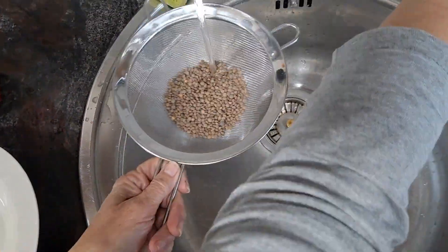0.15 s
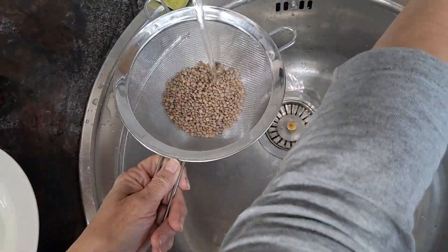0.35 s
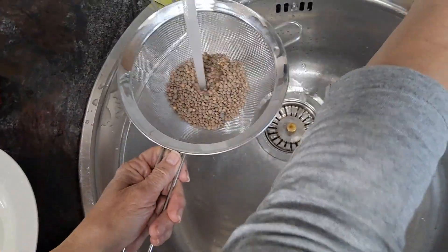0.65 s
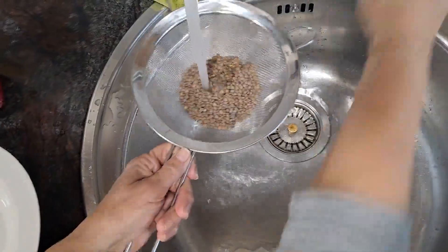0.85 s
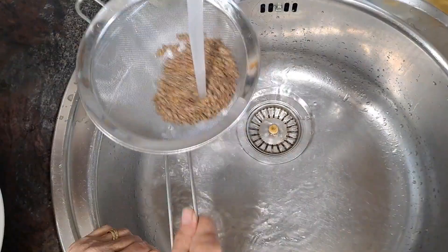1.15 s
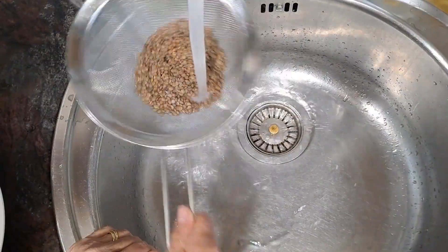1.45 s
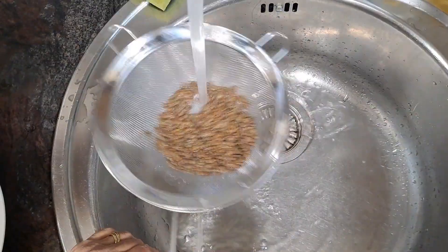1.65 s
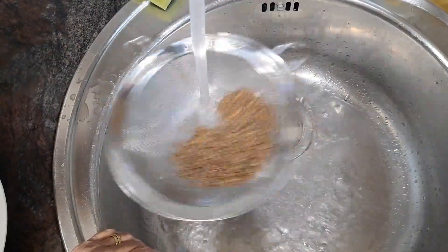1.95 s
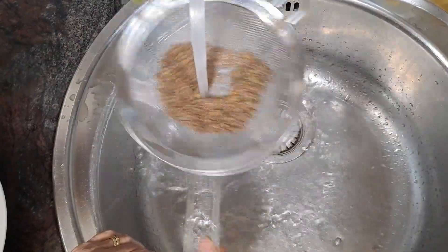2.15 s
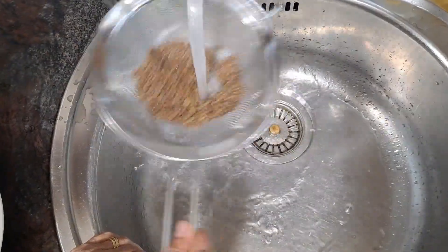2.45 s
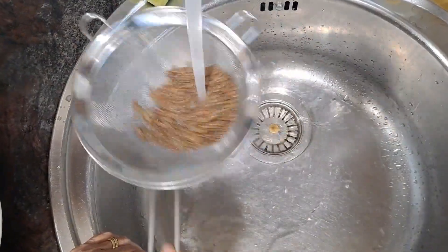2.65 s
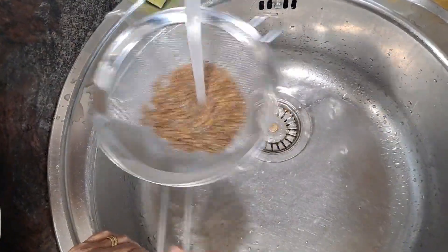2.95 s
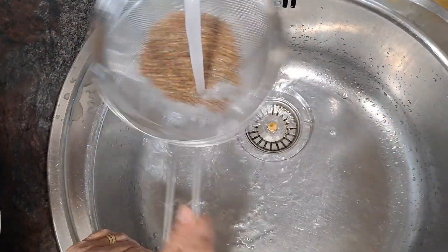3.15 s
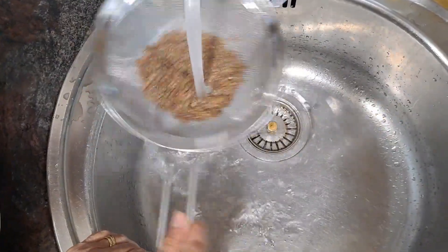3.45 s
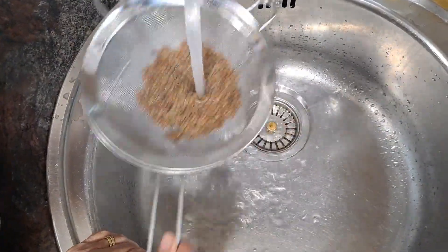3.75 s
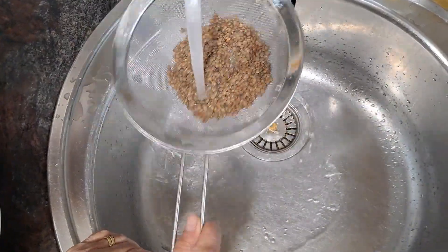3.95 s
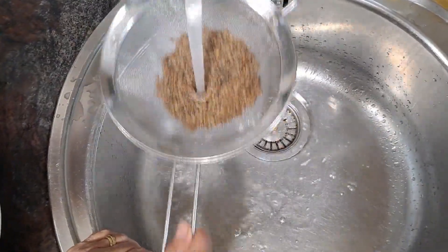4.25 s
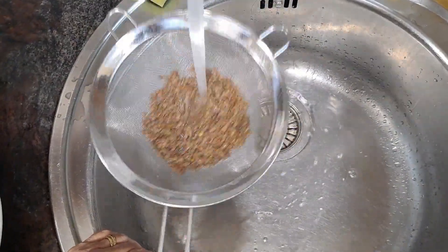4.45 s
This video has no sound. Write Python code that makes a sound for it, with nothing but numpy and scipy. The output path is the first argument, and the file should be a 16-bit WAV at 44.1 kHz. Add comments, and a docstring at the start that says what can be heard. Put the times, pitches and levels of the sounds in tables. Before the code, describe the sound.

In a quiet kitchen, separate drops and thin spatter tick for half a second as a tap opens onto lentils in a mesh strainer. By about one second the stream is a full bright hiss. It then surges with each swirl, with sharp splashes, small bubbly plips and low drumming of run-off on the steel sink. Close stereo pickup, little room sound.

```python
"""Rinsing lentils under the tap

Tap water is opened onto lentils in a mesh strainer that is then swirled over a steel sink.
Spray is banded noise whose power leaps with each drop; bubbles are short tones of rising pitch.
What runs through drums on the sink's bottom: shaken resonances that follow a list of gushes.
Two unlike microphone ports hear it close by, over a low room murmur; the sound drops out once."""
import sys
import numpy as np
from scipy import signal
from scipy.fft import rfft, irfft
from scipy.io import wavfile
from scipy.ndimage import uniform_filter1d

SR = 44100
rng = np.random.default_rng(int(sys.argv[2]) if len(sys.argv) > 2 else 0)


def unload_wav(signal):
    """Save mono or channel-first audio to the path in sys.argv[1] as 16-bit WAV at rate SR, clipped to [-1, 1]."""
    wavfile.write(
        sys.argv[1],
        SR,
        np.round(np.clip(np.atleast_2d(signal).T, -1, 1) * 32767).astype(np.int16),
    )


def attenuation_scalar(level_db):
    """Turn a level in dB into a linear amplitude multiplier (20 dB per decade)."""
    decades = np.asarray(level_db, float) / 20
    return 10 ** decades


N = 202680

# Centres of the spray's four bands, in Hz: gurgle, splatter, fizz, mist.
BAND_CENTRES_HZ = [1500, 3100, 6500, 13000]
# Spray bands in the same order. Each row: level in dB at full flow, dB per dB of fizz.
BAND_LEVELS = [(-42.5, 0.8), (-35.5, 0.9), (-31.0, 1.0), (-36.5, 0.85)]
# Water from the tap. Each row: time in seconds, fizz level in dB before the swings,
# dB by which gurgle strays from it, dB by which splatter strays.
FLOW_COURSE = [(0, -40.5, -13, -11), (.04, -49.5, -19, -5), (.22, -51, -2, -4), (.3, -54, -16, -4),
               (.38, -49, -12, -3), (.4, -45, -8, -5), (.47, -48.5, -8, -6), (.56, -39, -3.5, -2),
               (.7, -37.5, 1, -4), (.8, -41, 1, 2.5), (.9, -31.5, -1.5, -1.5), (1.12, -32, -3.5, -2.5),
               (1.3, -37, -0.5, 0.5), (1.6, -35, -1, -0.5), (1.98, -37.5, 1.5, 3), (2.03, -31, -2, -1.5),
               (2.27, -33, 1, 2.5), (2.75, -29, 1.5, 0), (2.88, -32.5, -1, 0.5), (2.93, -38, 3.5, 2.5),
               (3.22, -35, -0.5, -2.5), (3.51, -31, 1.5, 0), (3.97, -33.5, -1.5, 0.5),
               (4.22, -36, -0.5, -0.5), (4.6, -33.5, 0, 1)]
# Swings that throw the lentils under the stream. Each row: time of the top in seconds, dB gained.
STRAINER_SWINGS = [(1.228, 8.5), (1.43, 5.5), (1.64, 4.5), (1.82, 5.5), (2.08, 5), (2.32, 4), (2.44, 1),
                   (2.972, 7.5), (3.27, 7.5), (3.72, 1), (4.07, 4.5), (4.28, 3), (4.55, 2)]
# Single splashes. Each row: start in seconds, bubble's peak in dB before the bowl, pitch in Hz.
SPLASH_LIST = [(0.0596, -24.0, 5200), (0.093, -23.5, 4700), (0.1085, -24, 7460), (0.1267, -27, 4080),
               (0.131, -22.5, 6540), (0.1535, -27.5, 4370), (0.1943, -24.5, 6100), (0.206, -27.5, 12400),
               (0.237, -33.5, 4950), (0.268, -28.5, 7900), (0.301, -33.5, 4600), (0.3564, -38, 4170),
               (0.37, -27.5, 7400), (0.3922, -24.5, 6500), (0.4366, -31, 5800), (0.478, -25, 2620),
               (0.4798, -22.5, 6100), (0.523, -28, 4580), (0.556, -25, 3080), (0.5788, -23.5, 6500),
               (0.7568, -24.5, 2860), (0.7958, -25, 15010.0), (0.848, -17, 4670), (0.904, -16, 4540),
               (1.0484, -23, 14620.0), (1.0787, -21, 6660), (1.1833, -11, 4100), (1.211, -20, 2760),
               (1.2323, -17, 7320.0), (1.403, -22, 4130), (1.4517, -21, 5730), (1.4663, -30, 2300),
               (1.553, -12.5, 15000), (1.614, -19, 5080.0), (1.774, -31.5, 1940), (1.8208, -14, 5800),
               (2.036, -18.5, 3030), (2.049, -22, 2860), (2.0834, -13.5, 3310), (2.391, -16, 13200.0),
               (2.4, -29, 2760.0), (2.734, -27, 1890), (2.859, -19, 6300), (2.9647, -16, 14380.0),
               (2.9845, -12.5, 7400), (3.0418, -16, 5400), (3.061, -17, 4800), (3.0776, -13.5, 6100),
               (3.1082, -20, 15370.0), (3.2445, -16.5, 5060), (3.7098, -18, 3040), (3.7757, -22, 13310.0),
               (3.9001, -20, 14020.0), (3.93, -15, 7100), (4.0437, -21, 4550), (4.1092, -19.5, 14600.0),
               (4.159, -16, 7100), (4.2653, -20, 13390.0), (4.3272, -14, 15610.0), (4.536, -24, 4580)]
# How each microphone port colours the water. Each row: frequency in Hz, relative dB per Hz.
LEFT_PORT_RESPONSE = [(450, -17), (700, -13.5), (1150, -13), (1350, -10), (1850, -4.5), (2300, 0.5),
                      (4500, 6.5), (6400, 4), (8500, -1.5), (10000, -9.5), (11500, -15), (13600, -16.5),
                      (15200, -10.5), (15900, -36)]
RIGHT_PORT_RESPONSE = [(450, -31), (700, -20), (1150, -19), (1800, -10.5), (2300, -1.5), (4300, 6.5),
                       (4900, 10), (7200, 11), (8400, 2), (9500, -8.5), (10400, -63), (11500, -17),
                       (13500, -10.5), (15700, -13.5)]
# How alike the two ports hear the spray. Each row: frequency in Hz, shared part of the power (0 to 1).
PORT_LIKENESS = [(400, 0.59), (700, 0.68), (1700, 0.39), (2800, 0.13), (4800, 0.066), (6000, 0.051)]
# Resonances of the steel bowl. Each row: frequency in Hz, width in Hz, added gain (linear).
BOWL_MODES = [(877, 18, 0.6), (1367, 47, 1), (1490, 22, 0.13), (1830, 140, 0.99), (2895, 110, 0.3)]
# The sink mode that the gushes drive directly: frequency in Hz, width in Hz.
GUSH_MODE = (178, 19)
# Other modes of the sink. Each row: frequency in Hz, width in Hz, relative level in dB.
OTHER_SINK_MODES = [(52.6, 11, -16), (91, 21.7, -4), (118, 18, -3.5), (274.7, 56, -3), (326.6, 23, -3.5),
                    (603, 47, -9.5), (825, 200, -33)]
# Spills onto the steel. Each row: start in seconds, length in seconds,
# level in dB at the gush mode before the port gains.
GUSH_LIST = [(0.282, 0.066, -49.5), (.55, 0.046, -50.5), (0.705, 0.092, -52), (0.89, .12, -43.5),
             (1.104, 0.027, -38.5), (1.211, .05, -44.5), (1.412, 0.047, -39.5), (1.61, 0.11, -38.5),
             (1.794, 0.15, -38), (2.057, 0.033, -37), (2.14, 0.041, -47), (2.339, 0.14, -38.5),
             (2.633, 0.044, -41.5), (2.71, 0.038, -37.5), (2.784, .06, -42.5), (2.996, 0.13, -36.5),
             (3.258, 0.038, -38.5), (3.343, 0.13, -38.5), (3.628, 0.03, -41.5), (3.734, 0.1, -38),
             (3.93, 0.055, -46.5), (4.063, 0.047, -39.5), (4.16, 0.041, -34), (4.258, 0.028, -33.5),
             (4.325, 0.015, -28), (4.384, 0.025, -39.5), (4.457, 0.023, -40.5), (4.537, .08, -33.5)]
# Slow level of the other sink modes. Each row: time in seconds, dB before the port gains.
OTHER_MODES_LEVEL = [(0, -54.5), (.8, -55.5), (.9, -49), (1.55, -49), (1.83, -43.5), (2.2, -46.5),
                     (2.9, -48), (3.1, -50), (3.5, -48), (3.85, -48), (4.0, -50.5), (4.2, -49), (4.6, -48)]
# A low bump: start in seconds, end in seconds, level in dB before the port gains,
# first pitch in Hz, pitch it sinks towards in Hz.
LOW_BUMP = (.070, .136, -42, 105, 74)
# The brief dropout. Each row: time in seconds, gain in dB.
DROPOUT = [(1.1195, 0), (1.1225, -38), (1.145, -56), (1.151, -120), (1.162, -120), (1.166, -35), (1.168, 0)]

FULL_FLOW_DB = -31   # fizz level that counts as full flow
SWING_RISE_S, SWING_FADE_S = 0.049, 0.15
GUSH_ATTACK_DB_PER_S, GUSH_RELEASE_DB_PER_S = 700, 318
TRICKLE_DB = -60   # run-off between gushes, before the port gains
# dB that the other sink modes gain per dB of gush, more below DEEP_HZ
SINK_FOLLOWS, DEEP_FOLLOWS, DEEP_HZ = 0.12, 0.28, 150
RIGHT_LAG_S = 5.5e-5   # extra travel time to the right port
CUTOFF_HZ = 15830


def in_time(rows):
    """Columns joined by straight lines, one value a sample."""
    s, *columns = np.transpose(rows)
    return np.array([np.interp(np.arange(N) / SR, s, c) for c in columns])


def at_hz(points, hz):
    """A spectrum read on a log-frequency axis."""
    point_hz, values = np.transpose(points)
    return np.interp(np.log(hz), np.log(point_hz), values)


def rms_one(x):
    """Scaled so that the mean of the channels has rms 1."""
    return x / np.sqrt(np.mean(np.mean(x, axis=0) ** 2) + 1e-20)


def drift(rate):
    """Slow chance with spread 1: noise through two equal poles at rate Hz."""
    # one draw per 40 samples; the first 2000 let the filter settle
    pole = np.exp(-80 * np.pi * rate / SR)
    draws = rng.standard_normal(N // 40 + 2002)
    slow = signal.lfilter([1], [1, -2 * pole, pole * pole], draws)[2000:]
    return np.interp(np.arange(N) / 40, np.arange(len(slow)), slow / slow.std())


def pair(alike):
    """Two noises that share a part, which reaches the right port a little late."""
    shared, left, right = rng.standard_normal((3, N))
    alike = np.clip(alike, 0, 1)
    late = np.roll(shared, round(RIGHT_LAG_S * SR))
    return np.sqrt(alike) * np.array([shared, late]) + np.sqrt(1 - alike) * np.array([left, right])


def resonate(x, hz, width):
    """A two-pole resonance with gain 1 on top."""
    r = np.exp(-np.pi * width / SR)
    poles = [1, -2 * r * np.cos(2 * np.pi * hz / SR), r * r]
    return signal.lfilter([(1 - r * r) / 2, 0, (r * r - 1) / 2], poles, x)


def spray_levels():
    """The four levels of the spray in dB, from low to high, all led by the flow and the swings."""
    fizz_db, gurgle_db, splatter_db = in_time(FLOW_COURSE)
    t = np.arange(N) / SR
    for top, gain_db in STRAINER_SWINGS:
        rise = np.clip(1 + (t - top) / SWING_RISE_S, 0, 1)
        fade = np.exp(-np.maximum(t - top, 0) / SWING_FADE_S)
        fizz_db = fizz_db + gain_db * rise * fade
    over_full_db = fizz_db - FULL_FLOW_DB
    levels_db = np.array([full_db + follows * over_full_db for full_db, follows in BAND_LEVELS])
    return levels_db + np.array([gurgle_db, splatter_db, 0 * t, 0 * t])


def share_of(hz, centre_hz, octaves):
    """Power that a burst centred on one pitch puts into the band at hz."""
    return np.exp(-.5 * (np.log2(hz / centre_hz) / np.maximum(octaves, .05)) ** 2)


def bursts(hz, per_s, spread_db, octaves, draws):
    """Power kicks of drops that land at random, each with its own size and pitch."""
    when, size, pitch = draws[:int(per_s * N / SR)].T
    centre_hz = 800 * 22 ** pitch
    power = attenuation_scalar(-2 * spread_db * np.log(1 - .98 * size)) * share_of(hz, centre_hz, octaves)
    return np.bincount((when * N).astype(int), power, N)


def dying(kicks, t60):
    """Each kick of power rises at once and falls by 60 dB in t60 seconds; the mean is 1."""
    out = signal.lfilter([1], [1, -attenuation_scalar(-120 / (t60 * SR))], kicks + 1e-18)
    return out / out.mean()


def single_splashes(hz, spatter_db, octaves, t60, tail_db):
    """Power at hz of each listed splash: a broad tick, spatter round its pitch, droplets falling back."""
    out = np.zeros(N)
    t = np.arange(int(.1 * SR)) / SR
    droplets = attenuation_scalar(2 * tail_db - 120 * t / 0.11)
    spatter = (1 - np.exp(-t / 0.00087)) * (attenuation_scalar(-120 * t / t60) + droplets)
    tick = attenuation_scalar(-15.0 - 120 * t / 0.009)
    for s, peak_db, centre_hz in SPLASH_LIST:
        part = out[round(s * SR):][:len(t)]
        shape = share_of(hz, centre_hz, octaves) * spatter + share_of(hz, centre_hz, 0.48) * tick
        part += attenuation_scalar(2 * (peak_db + spatter_db)) * shape[:len(part)]
    return out


def spray():
    """Quarter-octave bands of hiss whose power leaps with every drop, coloured by each port."""
    levels_db = spray_levels()
    edges = 420 * 2 ** np.arange(0, 5.6, .25)
    fine_drops, coarse_drops = rng.random((2, 8000, 3))
    surge_db = 0.48 * drift(15.0) + 0.48 * drift(35.0)
    lumpy = attenuation_scalar(np.clip(-.6 * (levels_db[2] + 31.5), 0, 9))   # a thin stream breaks into separate drops
    freqs = np.maximum(np.fft.rfftfreq(N, 1 / SR), 1)
    ports = attenuation_scalar(np.array([at_hz(LEFT_PORT_RESPONSE, freqs), at_hz(RIGHT_PORT_RESPONSE, freqs)]))
    group_hz = np.array([0, 2200, 4400, 9500, SR])
    group_power = []
    for low, high in zip(group_hz, group_hz[1:]):
        inside = (freqs > max(low, 900)) & (freqs < min(high, 15800))
        group_power.append(np.sum(ports[:, inside] ** 2))
    out = 0
    for low, high in zip(edges, edges[1:]):
        hz = np.sqrt(low * high)
        coloured = irfft(rfft(pair(at_hz(PORT_LIKENESS, hz))) * ports, N)
        band = signal.sosfilt(signal.butter(2, [low, high], "band", fs=SR, output="sos"), coloured)
        # levels are per group of bands: turn them into gains and blend between the group centres
        place = np.interp(np.log(hz), np.log(BAND_CENTRES_HZ), range(4))
        k = min(int(place), 2)
        gains_db = levels_db[k:k + 2] - 10 * np.log10(np.array(group_power[k:k + 2]) / (2 * N))[:, None]
        hiss_db = gains_db[0] + (place - k) * (gains_db[1] - gains_db[0])
        crackle = dying(bursts(hz, 1200.0, 2.9, 0.59, fine_drops), 0.022)
        plops = dying(bursts(hz, 210.0, 4.66, 0.57, coarse_drops), 0.33)
        leaps = 0.31 + (0.2 * crackle + 0.0066 * plops) * lumpy
        power = attenuation_scalar(2 * (hiss_db + surge_db + 1.4 * drift(11.5))) * leaps
        band_power = np.mean(np.mean(band, axis=0) ** 2)
        power += single_splashes(hz, -11.5, 0.28, 0.016, -10.0) / band_power
        out = out + band * np.sqrt(power)
    return out


def bubbles(rows, cycles, rise):
    """Each row (s, peak dB, Hz) is trapped air ringing, its pitch climbing as it nears the surface."""
    out = np.zeros((2, N + SR))
    for (s, peak_db, hz), (size, phase, apart) in zip(rows, rng.random((len(rows), 3))):
        turns = np.arange(int(cycles * (.5 + size) * SR / hz)) * hz / SR
        along = turns / turns[-1]
        shape = (1 - np.exp(-turns / 1.4)) * attenuation_scalar(peak_db - 26.4 * along)
        left_db, right_db = at_hz(LEFT_PORT_RESPONSE, hz), at_hz(RIGHT_PORT_RESPONSE, hz)
        ports = attenuation_scalar(np.array([[left_db], [right_db]]) - max(left_db, right_db))
        # the paths to the two ports differ more, in phase, for high bubbles
        shift = (apart - .5) * (1 - at_hz(PORT_LIKENESS, hz)) - RIGHT_LAG_S * hz
        angle = turns * (1 + rise * along) + phase + np.array([[0], [shift]])
        out[:, round(s * SR):][:, :len(turns)] += ports * shape * np.sin(2 * np.pi * angle)
    return out[:, :N]


def gurgle(per_s, over_db, spread_db):
    """Bubbles born at random among the lentils, as loud as the spray at their pitch allows."""
    when, pitch, size = rng.random((4000, 3))[:int(per_s * N / SR)].T
    hz = 1100 * 8 ** pitch
    levels_db = spray_levels()[:, (when * N).astype(int)]
    spray_db = [np.interp(np.log(f), np.log(BAND_CENTRES_HZ), at) for f, at in zip(hz, levels_db.T)]
    peak_db = np.array(spray_db) + over_db - spread_db * np.log(1 - .97 * size)
    return bubbles(np.transpose([when * N / SR, peak_db, hz]), 24.6, 0.12)


def bowl(x):
    """The steel bowl rings along with the water at a few mid resonances."""
    return x + sum(gain * resonate(x, hz, width) for hz, width, gain in BOWL_MODES)


def evened(x, span_s, share):
    """Chance swells longer than span_s are partly flattened, the more so the larger the share."""
    power = uniform_filter1d(np.mean(x, axis=0) ** 2, int(span_s * SR)) + 1e-3
    return rms_one(x / power ** (np.clip(share, 0, 1) / 2))


def gushes():
    """Level in dB of the run-off: each gush rises fast, holds and drains away to a trickle."""
    t = np.arange(N) / SR
    power = attenuation_scalar(2 * TRICKLE_DB)
    for start, length, level_db in GUSH_LIST:
        attack_db = GUSH_ATTACK_DB_PER_S * np.maximum(start - t, 0)
        release_db = GUSH_RELEASE_DB_PER_S * np.maximum(t - start - length, 0)
        power = power + attenuation_scalar(2 * (level_db - attack_db - release_db))
    return 10 * np.log10(power)


def sink():
    """The uneven run-off shakes the steel bottom, which answers at its modes."""
    gush_db = gushes()
    others_db, swell_db = in_time(OTHER_MODES_LEVEL)[0], gush_db - gush_db.mean()
    push = pair(1.0) * attenuation_scalar(2.2 * drift(38.0))
    ringing = resonate(resonate(push, *GUSH_MODE), GUSH_MODE[0], 110.0)
    drumming = evened(rms_one(ringing), 0.079, 0.62)
    push = pair(0.93) * attenuation_scalar(1.5 * drift(11.5))
    others = 0
    for hz, width, db in OTHER_SINK_MODES:
        follows = DEEP_FOLLOWS if hz < DEEP_HZ else SINK_FOLLOWS
        ringing = resonate(resonate(push, hz, width), hz, 1.52 * width)
        others = others + attenuation_scalar(db + swell_db * follows) * rms_one(ringing)
    port_gains_db = np.array([[1.7], [-2.1]])   # the left port hears the sink louder than the right
    return (attenuation_scalar(gush_db) * drumming + attenuation_scalar(others_db) * others) * attenuation_scalar(port_gains_db)


def thump():
    """A low, soft shudder of a few cycles that sinks in pitch and stops."""
    start, end, level_db, first_hz, last_hz = LOW_BUMP
    along = np.clip((np.arange(N) / SR - start) / (end - start), 0, 1)
    hz = last_hz + (first_hz - last_hz) * np.exp(-along / 0.34)
    swell = np.sin(np.pi * along) ** 0.2
    shudder = swell * np.sin(2 * np.pi * (np.cumsum(hz) / SR + rng.random()))
    port_gains_db = np.array([[1.0], [-1.0]])
    return attenuation_scalar(level_db) * shudder * attenuation_scalar(port_gains_db)


def kitchen(level_db):
    """The room's steady low murmur of air and pipes: band-limited noise."""
    murmur_band = signal.butter(1, [60.0, 700.0], "band", fs=SR, output="sos")
    return attenuation_scalar(level_db) * rms_one(signal.sosfilt(murmur_band, pair(0.3)))


def scene():
    """Spray and bubbles, with the bowl ringing along, over the drumming sink."""
    water = spray() + gurgle(250.0, -5.5, 3.5) + bubbles(SPLASH_LIST, 47.0, 0.065)
    return bowl(water) + sink() + thump() + kitchen(-61.0)


def low_pass(x):
    """Removes everything above the highest recorded frequency."""
    return signal.sosfilt(signal.butter(12, 16970, fs=SR, output="sos"), x)


def record(dry):
    """A steep low-pass closes the top, and the sound drops out once, briefly."""
    steep_lowpass = signal.ellip(12, .5, 70, CUTOFF_HZ, fs=SR, output="sos")
    dull = signal.sosfilt(steep_lowpass, dry)
    mix = dull * attenuation_scalar(in_time(DROPOUT))
    return low_pass(mix)


dry = scene()
out = record(dry)
unload_wav(out)
```